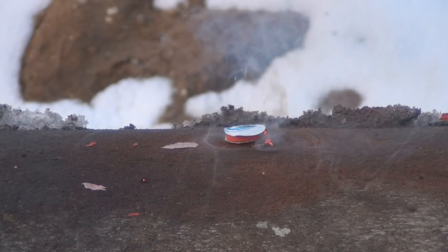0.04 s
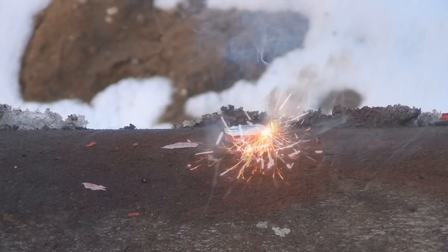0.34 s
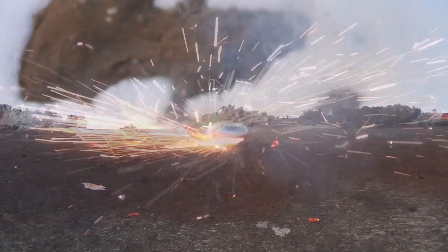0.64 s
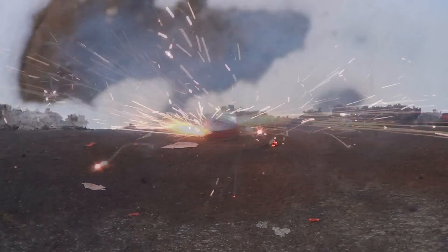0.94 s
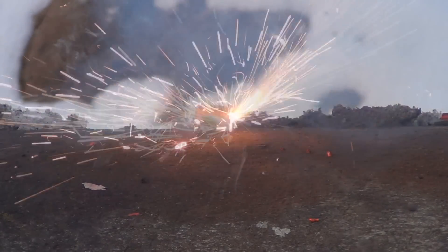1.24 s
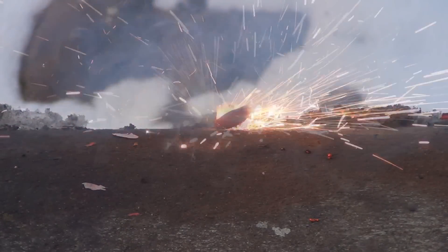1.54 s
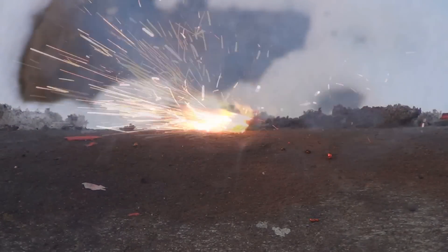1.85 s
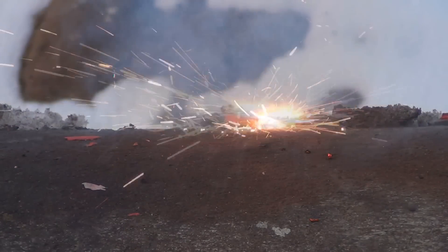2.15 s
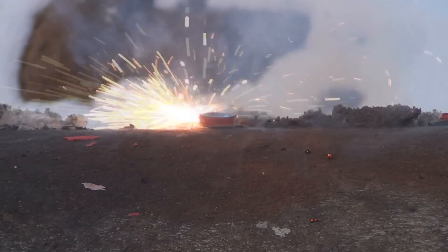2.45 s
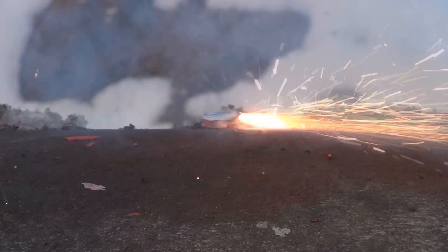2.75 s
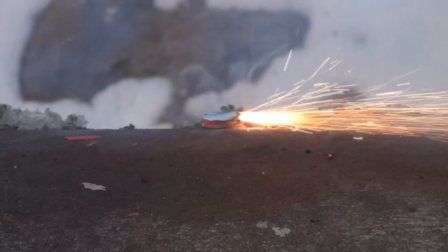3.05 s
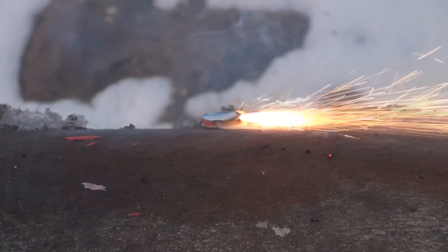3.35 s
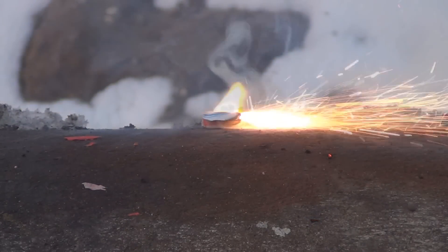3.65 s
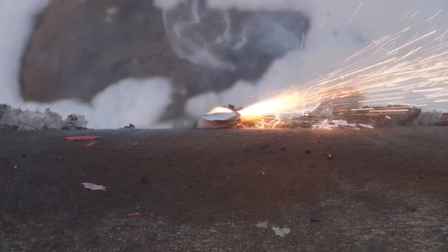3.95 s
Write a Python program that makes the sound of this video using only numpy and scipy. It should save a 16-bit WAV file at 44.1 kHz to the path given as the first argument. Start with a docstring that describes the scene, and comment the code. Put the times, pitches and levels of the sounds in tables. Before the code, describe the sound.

A small spinning firework hisses and crackles in quick swishes, then fizzes steadily.

```python
"""First a faint crackle: the fuse of a small ground spinner, on a ledge outdoors, close to the microphone.
The charge catches and a gas jet hisses and spits sparks, swishing each time the nozzle swings past.
Then the spin stalls and the jet fizzes on steadily, straight ahead.
Behind it lie a wide, distant roar and the low rumble of light wind."""
import sys
import numpy as np
from scipy import signal
from scipy.fft import rfft, irfft
from scipy.io import wavfile

SR = 44100
rng = np.random.default_rng(int(sys.argv[2]) if len(sys.argv) > 2 else 0)


def int16_out(signal):
    """Quantize to a 16-bit WAV file."""
    q = np.round(np.clip(np.atleast_2d(signal).T, -1, 1) * 32767)
    wavfile.write(sys.argv[1], SR, q.astype(np.int16))


N = 176400
TIME = np.arange(N) / SR


# The jet at close range, between swings: t/s, fizz level/dB, hiss level/dB
JET_LEVEL = [(.43,-40,-64), (.475,-30,-35.5), (.58,-25,-31), (.7,-26,-30.5), (.92,-28,-32.5),
             (1.08,-27,-36.5), (1.14,-27.5,-31), (1.33,-22,-27.5), (1.6,-27,-29.5), (1.78,-29.5,-32.5),
             (1.91,-35,-43.5), (2.2,-34,-35.5), (2.29,-37,-41.5), (2.34,-35,-42.5), (2.47,-38,-48),
             (2.69,-33.5,-38.5), (2.79,-34,-38.5), (3.0,-28,-33), (3.3,-26,-32.5), (3.68,-23.5,-29.5),
             (4,-26.5,-31.5)]
# The nozzle swings past the microphone: t/s, rise in fizz level/dB, half length/s
NOZZLE_SWINGS = [(.613,4.5,.017), (.657,4,.015), (.706,8.5,.021), (.802,8,.019), (.872,6.5,.015),
                 (.932,6.5,.02), (.985,6.5,.012), (1.043,5.5,.009), (1.109,6,.009), (1.164,3,.03),
                 (1.215,4,.009), (1.359,5,.033), (1.507,7,.028), (1.548,5.5,.02), (1.637,8.5,.02),
                 (1.678,6.5,.02), (1.765,6.5,.05), (1.832,5.6,.01), (2.012,8,.035), (2.06,3.5,.015),
                 (2.162,6,.036), (2.266,11,.023), (2.428,4.7,.013), (2.504,8.5,.02), (2.625,6.5,.04),
                 (2.672,7,.026), (3.295,4.5,.035)]
# Colour of the hiss: f/Hz, relative level/dB
HISS_COLOUR = [(1400, -16.5), (2300, -2), (2900, -2), (3400, -1), (4000, -1.5), (4600, 1.5), (5600, 2.5),
               (6100, -1), (6500, -10), (7200, -3), (9000, -26.5)]

def jet():
    """The gas jet sputters as it burns unevenly, louder and brighter whenever the nozzle swings past."""
    fizz_db, hiss_db = in_time(JET_LEVEL)
    swing_db = sum(db * bump(s, half) for s, db, half in NOZZLE_SWINGS)
    sputter = drift(per_s=240)
    flutter_db = .5 * drift(per_s=70)
    fizz_gain = from_db(fizz_db + .28 + swing_db + flutter_db + 1.5 * sputter)
    hiss_gain = from_db(hiss_db + .74 + .62 * swing_db + flutter_db + 1.35 * sputter)
    return fizz_gain * fizz() + hiss_gain * noise(HISS_COLOUR) + spray(swing_db)


# Colour of the fizz: f/Hz, relative level/dB
FIZZ_COLOUR = [(5500, -29), (6700, -15), (7300, -6.5), (8150, -6), (8800, -1.5), (9500, 1.5), (10400, -3.5),
               (11200, -1.5), (12000, -3), (12750, -9.5), (13700, -10), (14700, -13), (15700, -17)]
# Lift or cut of its topmost treble: t/s, level/dB
SHEEN_LEVEL = [(.5, 3), (1.7, 2), (2.0, 4.5), (2.6, 8), (2.85, -3), (3.4, -0.5), (4, 1.5)]

def fizz(sheen_hz=12000):
    """Thin noise of the nozzle, duller at the very top once the spin stalls."""
    sheen_db, = in_time(SHEEN_LEVEL)
    thin = noise(FIZZ_COLOUR)
    top = signal.sosfiltfilt(signal.butter(4, sheen_hz, "high", fs=SR, output="sos"), thin)
    return thin + (from_db(sheen_db) - 1) * top


# The low rush with its hollow colour: t/s, relative level/dB
RUSH_LEVEL = [(.45, -39), (.6, -32), (1.0, -30), (1.7, -30.5), (1.95, -36), (2.25, -32.5), (2.45, -41.5),
              (2.7, -30.5), (3.1, -32.5), (3.65, -28), (4, -31.5)]
# Hollow colouring of the sound, as from a nearby wall or the microphone:
# f/Hz, width of each filter pass/Hz, relative level/dB
HOLLOW_PEAKS = [(429, 147, -11), (779, 124, -1), (1128, 190, 0), (1599, 223, 1), (2010, 213, 1.5),
                (2500, 185, -3), (3070, 88, -3), (3636, 57, -5), (4065, 120, -10.5)]
# Colour of the low rush: f/Hz, relative level/dB
RUSH_COLOUR = [(120, -31.5), (260, -9.5), (380, -1.5), (600, -5), (1000, -2.5), (1500, -3), (2500, -22.5)]

def low_rush():
    """Under the hiss, a low rush with a hollow colour."""
    level_db, = in_time(RUSH_LEVEL)
    hollow = np.zeros(N)
    for hz, width, db in HOLLOW_PEAKS:
        band = resonance(rng.standard_normal(N), hz, width)
        hollow += from_db(db) * resonance(band, hz, width)
    return from_db(level_db) * (from_db(-3.5) * rms_one(hollow) + from_db(-8) * noise(RUSH_COLOUR))


# The spray of sparks, between swings: t/s, level/dB
SPRAY_LEVEL = [(.45, -44), (.52, -40), (.9, -35), (1.4, -32), (1.9, -38), (2.4, -38.5), (2.7, -38),
               (3.1, -41), (3.4, -41), (4, -44)]

def spray(swing_db):
    """The jet spits a dense spray of sparks that swells with each swing."""
    level_db, = in_time(SPRAY_LEVEL)
    return from_db(level_db + .5 * swing_db) * crackle(per_s=1500, spread_db=3.8)


# Colour of a spark, close up: f/Hz, relative level/dB
SPARK_COLOUR = [(1000, -18), (2500, -8.5), (5500, -7), (6500, -13), (7500, -5), (9500, 3.5), (11800, 2),
                (13000, -6), (15700, -4.5)]

def crackle(per_s, spread_db):
    """Sparks burst at random, most small and a few large; rms 1."""
    sizes = from_db(spread_db * np.minimum(rng.exponential(1, N), 3.5))
    signs = rng.choice([-1, 1], N)
    bursts = rng.random(N) < per_s / SR
    return rms_one(coloured(sizes * signs * bursts, SPARK_COLOUR))


# Single loud sparks at the microphone: t/s, peak level/dB
LOUD_SPARKS = [(.452, -15), (.467, -14), (.503, -14), (.5214, -1), (1.069, -11), (1.354, -7), (1.834, -5),
               (1.997, -7), (2.02, -6), (2.057, -8), (2.424, -9), (2.65, -7), (2.667, -7), (2.722, -10),
               (2.777, -11), (3.121, -8), (3.157, -9)]

def pops():
    """Single large sparks snap."""
    s, db = np.transpose(LOUD_SPARKS)
    clicks = np.zeros(N)
    clicks[(s * SR).astype(int)] = from_db(db)
    unit_peak = np.abs(coloured(signal.unit_impulse(N), SPARK_COLOUR)).max()
    return coloured(clicks, SPARK_COLOUR) / unit_peak


# The fuse, faint even this close: t/s, relative level/dB
FUSE_LEVEL = [(0, -46.5), (.07, -57), (.14, -51.5), (.29, -53), (.36, -56), (.45, -53), (.55, -75)]

def fuse():
    """The fuse fizzes and ticks until the charge catches."""
    level_db, = in_time(FUSE_LEVEL)
    ticks = from_db(1) * crackle(per_s=400, spread_db=2.5)
    fizzle = from_db(.5) * noise(SPARK_COLOUR)
    return from_db(level_db) * (ticks + fizzle)


# Colour of the roar, far off: f/Hz, relative level/dB
ROAR_COLOUR = [(100, -17), (150, -9), (250, -14.5), (420, -10), (600, -6), (790, -2), (1100, -3),
               (1500, -11), (1850, -13.5), (2200, -21.5), (2800, -23), (3400, -41.5), (7000, -38.5)]
# Further shaping of its stereo side signal: f/Hz, level/dB
ROAR_WIDTH = [(40, -33), (100, -32), (200, -28.5), (380, -13), (700, -10.5), (1290, -3), (2400, -19.5),
              (4400, -17.5), (8000, -22.5)]
# Course of the roar: t/s, mid level/dB, side level before that shaping/dB
ROAR_LEVEL = [(0, -38.5, -39.5), (.45, -38.5, -42.5), (1.0, -40.5, -44), (1.9, -39, -39),
              (2.22, -36.5, -41.5), (2.36, -39, -39), (2.48, -36.5, -40), (2.6, -38, -41.5),
              (4, -37.5, -43)]

def distant_roar():
    """A roar from far away spreads to the left and right of the microphone."""
    mid_db, side_db = in_time(ROAR_LEVEL)
    side = from_db(side_db) * coloured(noise(ROAR_COLOUR), ROAR_WIDTH)
    mid = from_db(mid_db) * noise(ROAR_COLOUR)
    return np.array([mid + side, mid - side])


# Colour of the wind: f/Hz, relative level/dB
WIND_COLOUR = [(20, -11), (36, -1.5), (50, 3), (64, 5.5), (80, -5.5), (102, 0), (135, -11.5), (250, -28)]
# Wind at the microphone: t/s, level/dB
WIND_LEVEL = [(.2, -53.5), (.7, -51.5), (2, -48.5), (4, -49.5)]

def wind():
    """Light wind rumbles low under everything."""
    level_db, = in_time(WIND_LEVEL)
    return from_db(level_db) * noise(WIND_COLOUR)


def from_db(db):
    """Decibels to gain."""
    return 10 ** (np.asarray(db) / 20)


def rms_one(x):
    """Scale to unit rms."""
    return x / np.sqrt(np.mean(x ** 2) + 1e-20)


def in_time(rows):
    """One curve for each column of a table of times."""
    s, *columns = np.transpose(rows)
    return [np.interp(TIME, s, c) for c in columns]


def bump(at_s, half_s):
    """A bell curve in time, of height 1."""
    return np.exp(-((TIME - at_s) / half_s) ** 2)


def coloured(x, spectrum):
    """Causal (minimum-phase) filter with the given response: f/Hz, level/dB."""
    hz, db = np.transpose(spectrum)
    grid = np.maximum(np.fft.rfftfreq(2 * N, 1 / SR), 1)
    gain = from_db(np.interp(np.log(grid), np.log(hz), db))
    cepstrum = irfft(np.log(gain))
    cepstrum[1:N] *= 2
    cepstrum[N + 1:] = 0
    return irfft(rfft(x, 2 * N) * np.exp(rfft(cepstrum)))[:N]


def noise(spectrum):
    """Turbulence of the given colour; rms 1."""
    return rms_one(coloured(rng.standard_normal(N), spectrum))


def drift(per_s):
    """Smooth chance that changes about per_s times a second; rms 1."""
    r = np.exp(-2 * np.pi * per_s / SR)
    return rms_one(signal.lfilter([1], [1, -2 * r, r * r], rng.standard_normal(N + SR))[SR:])


def resonance(x, hz, width_hz):
    """Two-pole resonance with gain 1 on top."""
    r = np.exp(-np.pi * width_hz / SR)
    feedback = [1, -2 * r * np.cos(2 * np.pi * hz / SR), r * r]
    return signal.lfilter(np.array([1, 0, -1]) * (1 - r * r) / 2, feedback, x)


def scene():
    """The firework close by and straight ahead, the open air around it."""
    ignition_s, catch_s = .442, .04
    alight = np.clip((TIME - ignition_s) / catch_s, 0, 1)
    return fuse() + alight * (jet() + low_rush()) + pops() + distant_roar() + wind()


# Brief dips in level: t/s, depth (0-1), half length/s
LEVEL_DIPS = [(0.399, 0.88, 0.0044), (2.868, 1, 0.0029)]

def record(dry):
    """The level dips briefly twice; the highest treble is cut."""
    cutoff_hz = 15780
    gain = np.prod([1 - depth * bump(s, half) for s, depth, half in LEVEL_DIPS], axis=0)
    lowpass = signal.firwin(601, cutoff_hz, window="blackman", fs=SR)
    return signal.fftconvolve(dry * gain, lowpass[None], "same", axes=1)


dry = scene()
out = record(dry)
int16_out(out)
```